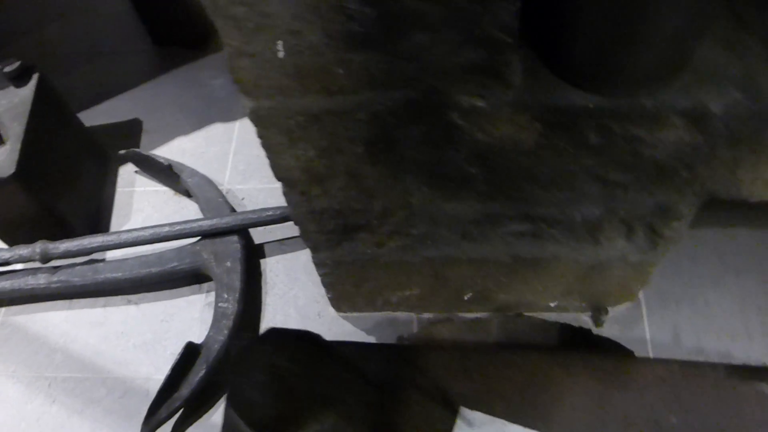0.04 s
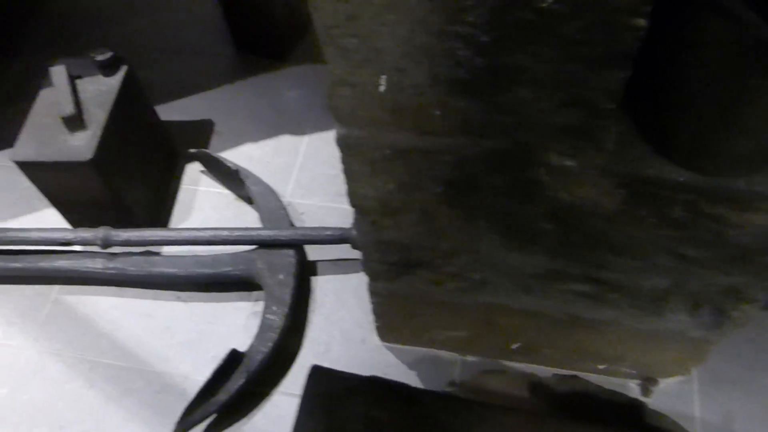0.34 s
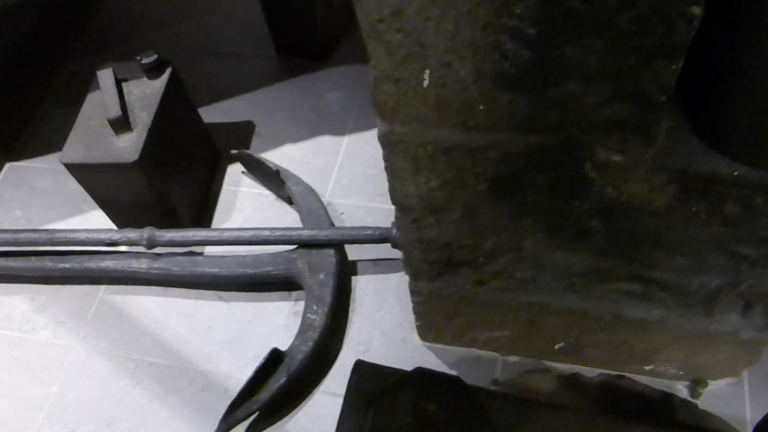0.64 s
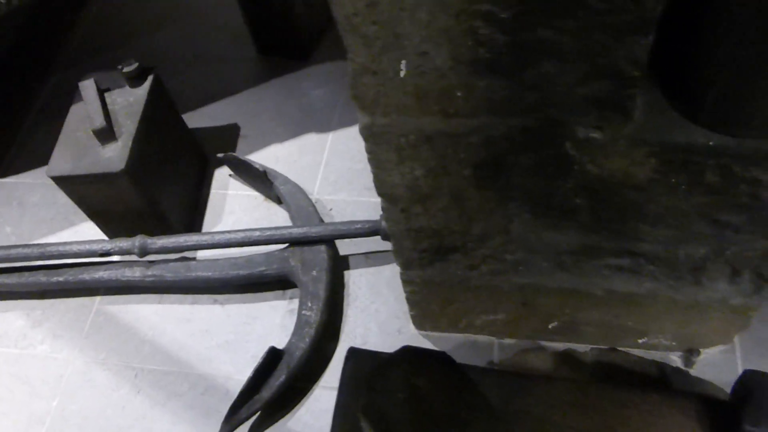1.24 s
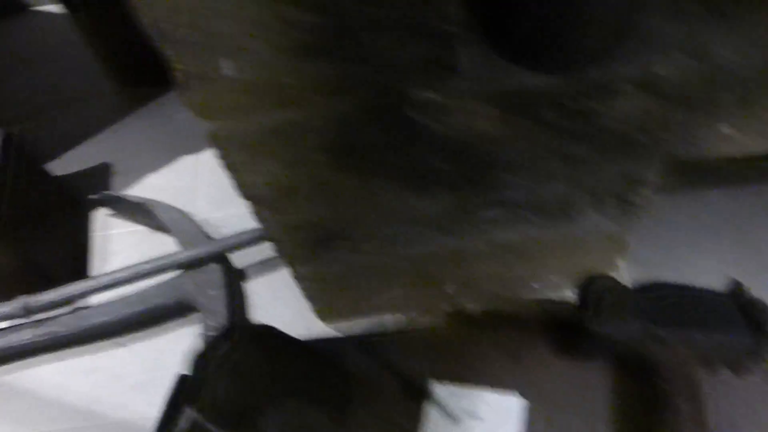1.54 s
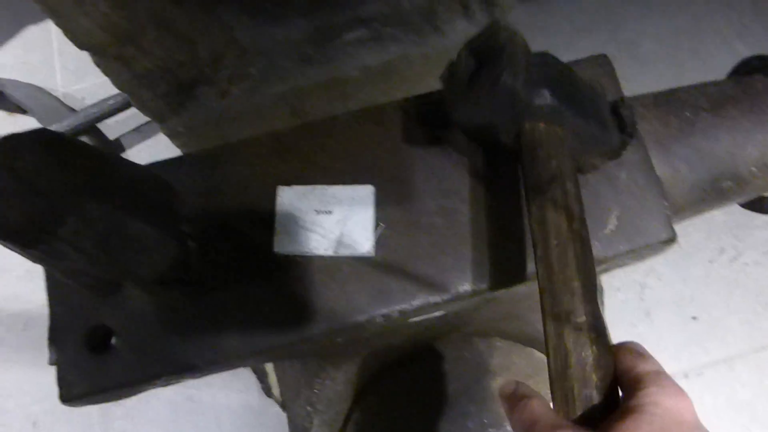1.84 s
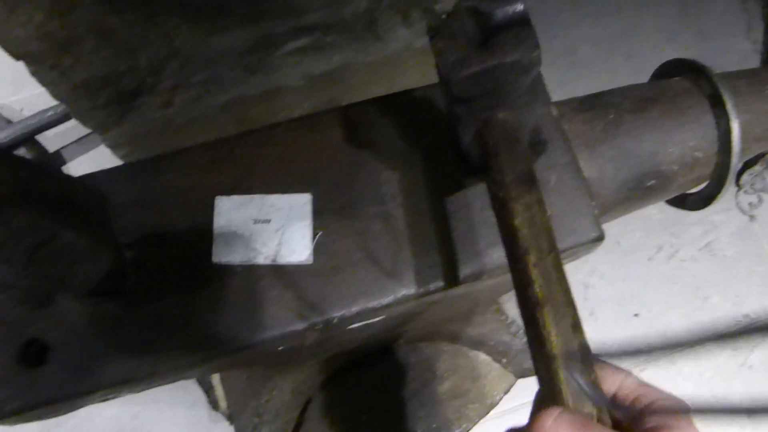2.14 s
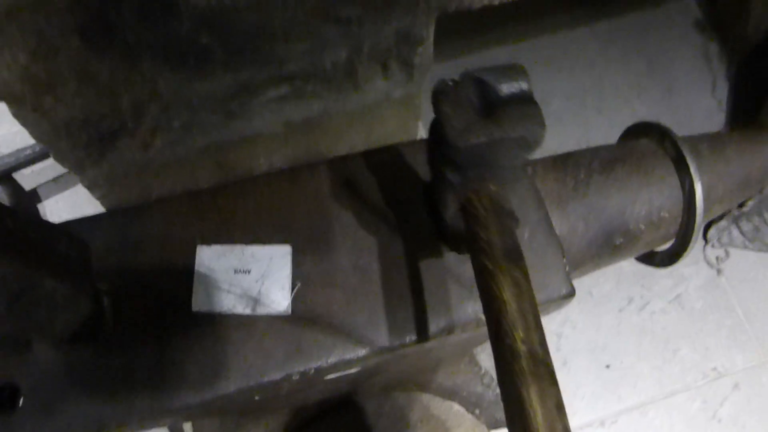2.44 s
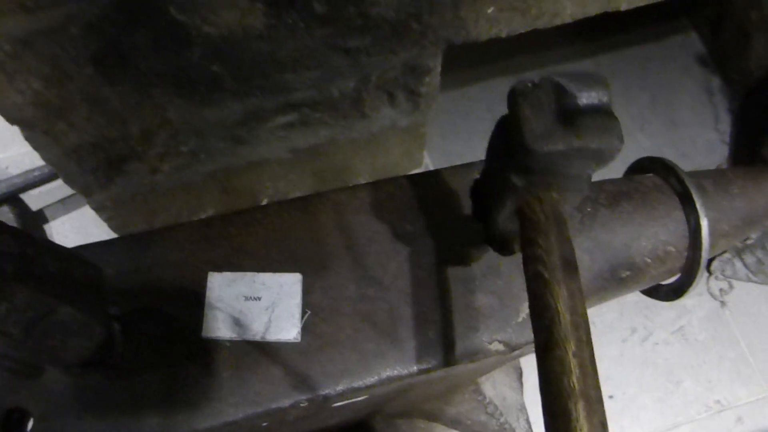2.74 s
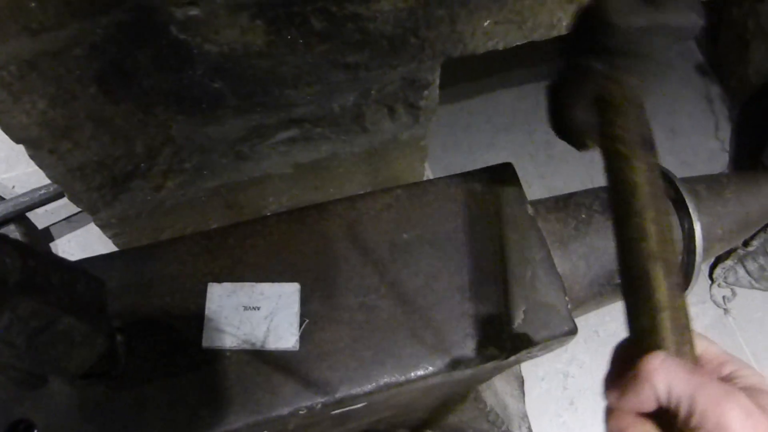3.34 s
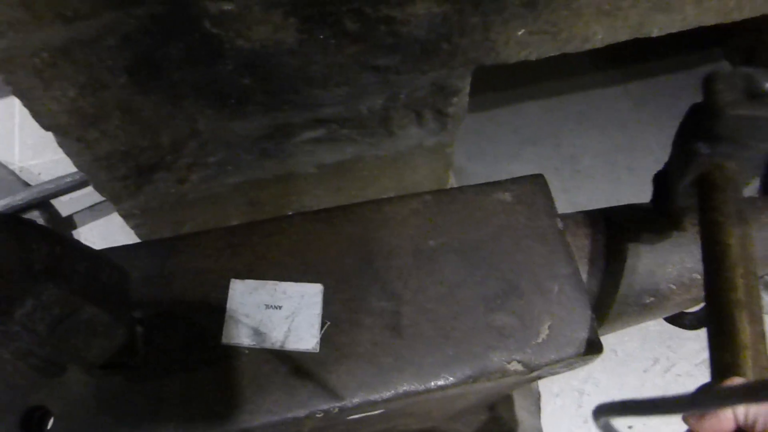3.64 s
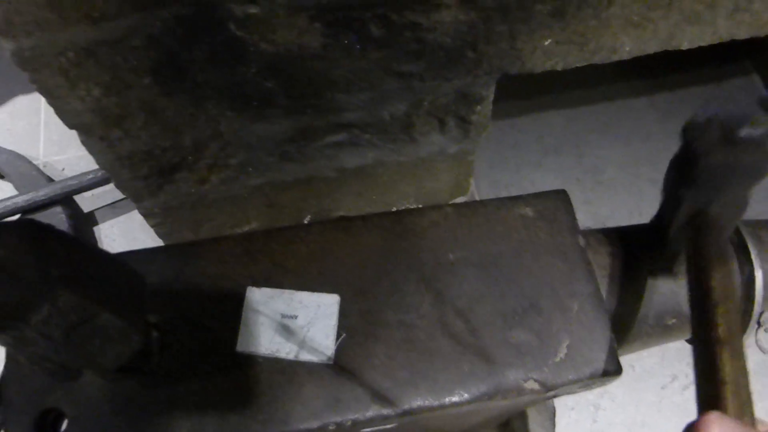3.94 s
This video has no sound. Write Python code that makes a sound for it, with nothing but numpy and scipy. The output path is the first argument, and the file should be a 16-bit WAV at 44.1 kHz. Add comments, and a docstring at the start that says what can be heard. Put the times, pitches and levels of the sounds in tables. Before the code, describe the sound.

One sharp, ringing hammer blow on an anvil, close by, over a faint fan hum.

```python
"""In a quiet stone-floored workshop, a hand hammer strikes an iron anvil once, close by. At first the ring of
an earlier, softer blow is dying away; a ventilation fan hums over soft room noise, and a sleeve rustles, with
tiny handling ticks. The brief contact gives a hard, broadband crack and a thud from the stand. The anvil rings
on in its inharmonic modes while the room's reflections merge into reverberation."""
import sys
import numpy as np
from scipy import signal
from scipy.fft import rfft, irfft
from scipy.io import wavfile

SR = 44100
rng = np.random.default_rng(int(sys.argv[2]) if len(sys.argv) > 2 else 0)


def unload_audio(sound):
    """Save the sound as a 16-bit wav file, at the path given as the first command line argument."""
    columns = np.transpose(np.atleast_2d(sound))
    # keep every value between -1 and 1, then stretch to whole-number steps
    steps = np.round(np.clip(columns, -1, 1) * 32767)
    wavfile.write(sys.argv[1], SR, steps.astype(np.int16))


N = 176400
TIME = np.arange(N) / SR
BINS = np.maximum(np.arange(N // 2 + 1) * SR / N, 1)
BLOW_S = 3.0069   # the hammer lands

# stereo width of the crack and reverberation: (frequency [Hz], side relative to mid [dB])
BLOW_WIDTH = [(100, -35.5), (300, -45), (600, -31.5), (1200, -12), (4000, -17.5), (8000, -12), (13000, -3)]
# stereo width of the quiet noises: (frequency [Hz], side relative to mid [dB])
AIR_WIDTH = [(60, -1.5), (110, -12.5), (200, -17.5), (380, -19.5), (700, -3), (1290, 2), (2380, -1),
             (4400, -2.5), (8120, -6.5), (15000, -5.5)]


def from_db(db):
    """Decibels to amplitude ratio."""
    return 10 ** (np.asarray(db) / 20)


def rms_one(x):
    """Normalisation to unit rms."""
    return x / np.sqrt(np.mean(x ** 2) + 1e-20)


def at_hz(points, hz):
    """Interpolation on a log-frequency axis."""
    frequencies, values = np.transpose(points)
    return np.interp(np.log(hz), np.log(frequencies), values)


def envelope(rows):
    """Amplitude envelope through rows of (time [s], level [dB])."""
    return from_db(np.interp(TIME, *np.transpose(rows)))


def drift(rate):
    """Random modulation: noise of unit spread, low-passed at rate [Hz]."""
    pole = np.exp(-80 * np.pi * rate / SR)
    slow = signal.lfilter([1], [1, -2 * pole, pole * pole], rng.standard_normal(N // 40 + 2002))[2000:]
    return np.interp(np.arange(N) / 40, np.arange(len(slow)), rms_one(slow))


def noise(spectrum, width):
    """Spectrally shaped mid-side noise of unit rms."""
    mid, side = rfft(rng.standard_normal((2, N))) * from_db(at_hz(spectrum, BINS))
    side = side * from_db(at_hz(width, BINS))
    return rms_one(irfft(np.array([mid + side, mid - side]), N))


def decay(age, t60):
    """Exponential damping: silence before the onset, then 60 dB down every t60."""
    return (age >= 0) * np.exp(-np.log(1000) * np.clip(age / t60, 0, 10))


def release(age, hold_s, db_per_s):
    """Additional exponential decay once the hold is over."""
    return from_db(-db_per_s * np.clip(age - hold_s, 0, 2))


def tone(hz, waver, rate):
    """A sine under random amplitude and phase modulation, slightly different on each side."""
    phase = 2 * np.pi * (hz * TIME + rng.random())
    mid = (1 + waver * drift(rate)) * np.sin(phase) + waver * drift(rate) * np.cos(phase)
    side = 0.6 * waver * drift(rate) * np.cos(phase + 1)
    return np.array([mid + side, mid - side])


def lingering_ring():
    """Free decay: the anvil's modes still hold energy from an earlier, softer blow."""
    # (frequency [Hz], initial level [dB], t60 [s])
    modes = [(392.5, -46.5, 2.6), (1704, -57, 0.49), (1943, -30, 0.4), (1943, -45.5, 1.16),
             (5825, -62.5, 0.43)]
    return sum(from_db(db) * decay(TIME, t60) * tone(hz, waver=0.19, rate=12) for hz, db, t60 in modes)


def ventilation():
    """Tonal and broadband noise: a fan's wavering tones stand above the room's noise floor."""
    # course of the main fan tone: (time [s], relative level [dB])
    hum_levels = [(0.0, -71), (0.06, -60), (0.3, -61.5), (0.4, -69), (0.66, -59), (0.78, -72), (0.8, -64),
                  (2.01, -53.5), (2.82, -53.5), (2.95, -55)]
    # weaker fan tones: (frequency [Hz], level [dB])
    fan_tones = [(202, -67.5), (501, -69.5), (528, -76), (838, -74), (1421, -78.5)]
    # colour of the room noise: (frequency [Hz], relative spectral density [dB])
    air_spectrum = [(25, -8.5), (55, -21.5), (99, -24), (204, -18), (253, -18), (349, -9.5), (410, -16.5),
                    (495, -13.5), (647, -22.5), (847, -21), (1110, -27), (2770, -31), (3340, -35.5),
                    (3920, -31), (5000, -37), (8400, -36), (9100, -44.5), (9800, -36.5), (11000, -38),
                    (14000, -41), (15500, -48)]
    # course of the room noise: (time [s], level [dB])
    air_levels = [(0, -55), (.25, -56.5), (.55, -55.5), (1.3, -55), (1.7, -54.5), (2.9, -52), (4, -53.5)]
    hum = np.sqrt(2) * from_db(4.5) * envelope(hum_levels) * tone(355.8, waver=0.13, rate=5.57)
    hum += sum(from_db(db) * tone(hz, waver=0.49, rate=7.5) for hz, db in fan_tones)
    return hum + envelope(air_levels) * noise(air_spectrum, AIR_WIDTH)


def handling_ticks():
    """Damped transients: each tiny tick is a burst of noise around one spectral peak."""
    # (time [s], level [dB], peak frequency [Hz], t60 [s])
    ticks = [(0.136, -56, 2650, 0.14), (.225, -55, 1020, 0.33), (.505, -56.5, 2900, 0.065),
             (2.568, -54, 4200, 0.018)]
    out = 0
    for start, db, hz, t60 in ticks:
        spectrum = [(hz / 2, -20), (hz, 0), (hz * 1.5, -16), (hz * 3, -24), (hz * 6, -40)]
        out += from_db(db) * decay(TIME - start, t60) * noise(spectrum, AIR_WIDTH)
    return out


def sleeve_rustle():
    """Friction noise: cloth rubs unevenly, so each swell is grainy."""
    # (centre time [s], level [dB], half length [s])
    rubs = [(0.244, -63, 0.12), (1.588, -57.5, .12), (1.883, -63, 0.18)]
    # (frequency [Hz], relative spectral density [dB])
    cloth_spectrum = [(400, -6), (1400, -7.5), (3300, -16.5), (5500, -12), (8300, -16), (9100, -21),
                      (10300, -15), (15000, -26)]
    rubbing = sum(from_db(db) * np.exp(-((TIME - centre) / half) ** 2) for centre, db, half in rubs)
    grain = from_db(2.5 * drift(rate=150))
    return noise(cloth_spectrum, AIR_WIDTH) * rubbing * grain


def impact():
    """Impulsive excitation: steel on iron gives a broadband crack, then the stand and floor thud."""
    # (frequency [Hz], relative spectral density [dB])
    crack_spectrum = [(40, -45.5), (130, -36.5), (400, -15), (800, -10), (1150, 0), (1600, -1), (3000, 0.5),
                      (3900, 7), (5500, -8.5), (7500, -2.5), (9200, -19), (11000, -11.5), (15000, -24)]
    # modes of the stand and floor: (frequency [Hz], level [dB], t60 [s])
    stand_modes = [(197.2, -31.5, 0.96), (236, -18.5, 0.14), (320, -10, 0.042), (665, -18.5, 0.067),
                   (1092, -19, 0.0505), (1205, -21.5, 0.1)]
    crack = from_db(-0.5) * noise(crack_spectrum, BLOW_WIDTH) * decay(TIME - BLOW_S, t60=0.015)
    age = TIME - BLOW_S - 0.003   # the stand answers 3 ms later
    thud = sum((-1) ** k * from_db(db) * decay(age, t60) * np.sin(2 * np.pi * hz * age)
               for k, (hz, db, t60) in enumerate(stand_modes))
    return crack + thud


def anvil_ring():
    """Modal vibration: a main note swells among inharmonic partials, which reflections make waver."""
    # the partials, in matching order: (frequency [Hz]), (level [dB]), (t60 before the release [s])
    partial_hz = [393, 473, 2159, 2326, 2406, 2444, 3682, 3805, 3948, 3960, 4062, 4142, 4410, 4575, 4693,
                  4829, 5055, 5636, 5653, 6092, 6320, 6547, 6740, 7111, 7736, 7908, 8419, 9430, 9524, 10571,
                  10870, 11380, 13640]
    partial_db = [-35.5, -27.5, -37, -43, -34.5, -27.5, -37.5, -21.5, -31.5, -22, -25, -32.5, -29.5, -25.5,
                  -22, -29, -34, -36.5, -33, -38.5, -37.5, -36.5, -46, -32.5, -41.5, -38, -45.5, -42.5,
                  -40.5, -40.5, -40, -51.5, -47]
    partial_t60 = [3.0, 1.3, 1.5, .8, 1.1, .9, .8, .85, .8, .75, .5, .72, 0.33, 0.57, .72, .8, .75, 0.92,
                   .8, .65, .72, .78, 0.58, 0.33, 0.97, 0.57, 0.71, 0.4, .7, .72, .52, .6, .42]
    direct_share, swell_s = 0.27, 0.078
    age = TIME - BLOW_S
    swell = 1 - (1 - direct_share) * np.exp(-np.maximum(age, 0) / swell_s)
    note = swell * decay(age, t60=1.157) * release(age, hold_s=0.42, db_per_s=87)
    out = from_db(-9.5) * note * tone(1939, waver=0.19, rate=2.2)
    for hz, db, t60 in zip(partial_hz, partial_db, partial_t60):
        height = min(hz / 4000, 1)   # high partials waver more and die faster towards the end
        fading = decay(age, t60) * release(age, hold_s=0.27, db_per_s=48 * height ** 2)
        out += from_db(db) * fading * tone(hz, waver=0.61 * height, rate=3.4)
    return out


def reverberation():
    """Diffuse field: the workshop's reflections form a dense tail that dies sooner in the treble."""
    # (frequency [Hz], relative spectral density [dB])
    tail_spectrum = [(40, -34), (85, -31), (125, 0.5), (165, -7), (220, 1), (330, 3), (480, -4.5),
                     (850, -9), (1200, -11), (1700, -9.5), (2800, -13), (3400, -11.5), (4050, -2.5),
                     (4700, -10), (5400, -19.5), (7500, -16), (8600, -19), (9100, -31), (9600, -20),
                     (10800, -21.5), (12000, -24), (13700, -21), (14600, -50)]
    # reverberation time: (frequency [Hz], t60 before the release [s])
    tail_t60 = [(80, 0.54), (300, 1.9), (1200, 1.25), (4000, 1.03), (8000, 0.53), (13000, 0.28)]
    spectrum = rfft(noise(tail_spectrum, BLOW_WIDTH))
    centres = np.geomspace(80, 14000, 10)
    out, age = 0, TIME - BLOW_S
    for hz, share in zip(centres, np.eye(len(centres))):
        band = irfft(spectrum * np.interp(np.log(BINS), np.log(centres), share), N)
        out += band * decay(age, at_hz(tail_t60, hz))
    return from_db(-20.5) * out * release(age, hold_s=0.24, db_per_s=47)


def scene():
    """Superposition: the anvil, barely left of centre, adds to the workshop's quiet sounds."""
    pan = from_db([[0.05], [-0.05]])
    blows = lingering_ring() + impact() + anvil_ring() + reverberation()
    return pan * blows + ventilation() + handling_ticks() + sleeve_rustle()


def record(dry):
    """Overload and band limiting: the crack clips, then the deep bass and the top are cut."""
    low_cut = signal.butter(3, 99.5, "high", fs=SR, output="sos")
    high_cut = signal.cheby2(16, 70, 16400, fs=SR, output="sos")
    clipped = np.clip(dry, -1, 1)
    return signal.sosfilt(high_cut, signal.sosfilt(low_cut, clipped))


dry = scene()
out = record(dry)
unload_audio(out)
```